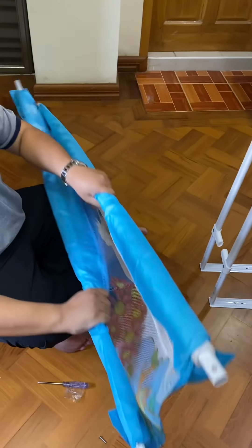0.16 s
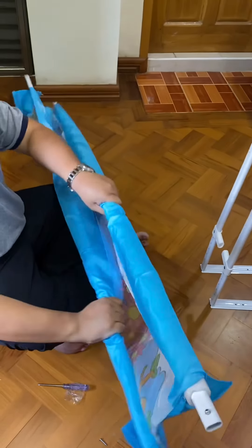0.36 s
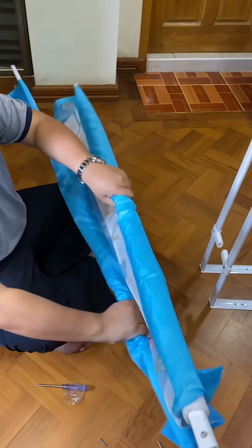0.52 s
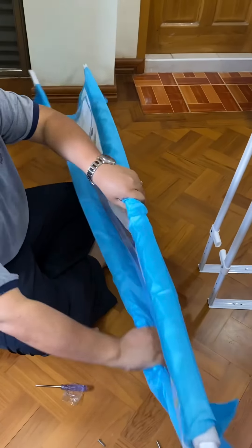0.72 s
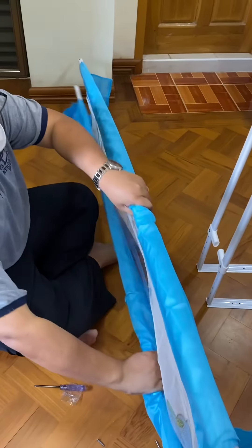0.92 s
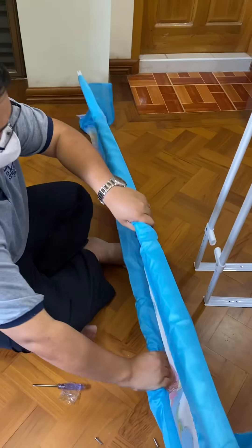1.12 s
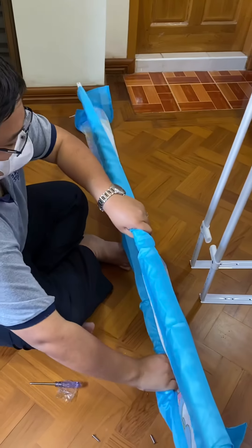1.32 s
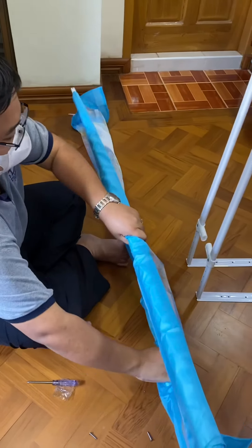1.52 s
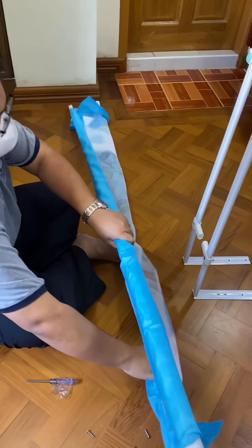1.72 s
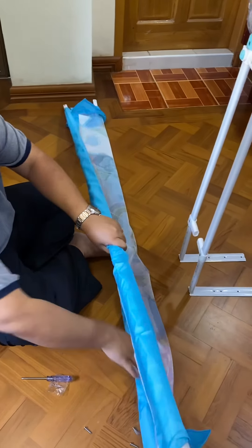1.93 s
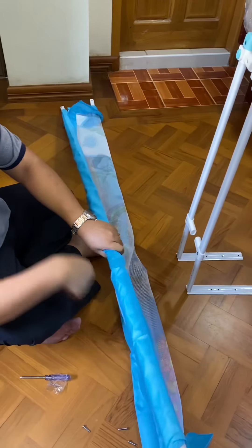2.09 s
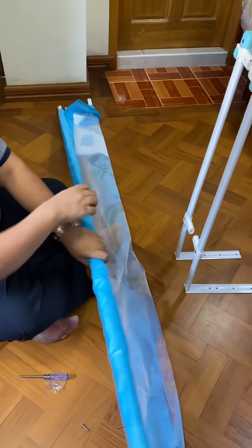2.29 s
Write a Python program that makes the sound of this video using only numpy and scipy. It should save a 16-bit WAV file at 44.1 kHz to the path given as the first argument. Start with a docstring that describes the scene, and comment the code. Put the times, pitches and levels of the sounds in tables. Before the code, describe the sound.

Metal poles in fabric sleeves clank in a small, hard, quiet room. A faint ring fades at the start; a loud, bright double clack with rattle hits at 0.23 seconds, with small taps after. A softer knock comes at 1.06, a sharp click at 1.5, then a cluster from 1.72 to 1.96, strongest near 1.83. Cloth rustles faintly around the knocks, over low hum and hiss.

```python
"""A small hard room: two fabric-sleeved metal poles of a bed rail knock together and on a wooden floor.
Each contact is a damped sine knock, a band of low noise for the floor, a noise burst for the clatter,
and decaying sines for both poles. The sleeves rustle and snap in coloured noise as they slide.
Behind them lie a faint noise hiss and a low hum of sines with wavering phase."""
import sys
import numpy as np
from scipy import signal
from scipy.fft import rfft, irfft, next_fast_len
from scipy.io import wavfile

SR = 44100
rng = np.random.default_rng(int(sys.argv[2]) if len(sys.argv) > 2 else 0)


def bounce(signal):
    """Save signal as a 16-bit WAV file at the path given by the first command-line argument."""
    frames = np.transpose(np.atleast_2d(signal))
    limited = np.clip(frames, -1, 1)
    pcm = np.round(limited * 32767).astype(np.int16)
    wavfile.write(sys.argv[1], SR, pcm)


N = 103635  # length in samples


def amp(db):
    """Amplitude factor of a level in dB."""
    return 10 ** (np.asarray(db) / 20)


def unit(x):
    """The signal scaled to an rms of 1."""
    return x / np.sqrt(np.mean(x ** 2) + 1e-20)


def along(points, hz):
    """Read (Hz, value) points on a log frequency axis."""
    f, v = np.transpose(points)
    return np.interp(np.log(hz + 1), np.log(f + 1), v)


def curve(rows):
    """Draw (s, value) rows as a line with one value per sample."""
    return np.interp(np.arange(N) / SR, *np.transpose(rows))


def fade(t, t60):
    """Exponential decay that loses 60 dB in t60 seconds."""
    return amp(-60 * t / t60)


def filtered(x, response):
    """Multiply the spectrum of x by a response of frequency."""
    m = next_fast_len(x.shape[-1] + 8192)
    spectrum = rfft(x, m) * response(np.fft.rfftfreq(m, 1 / SR))
    return irfft(spectrum, m)[..., :x.shape[-1]]


def noise(response, size):
    """Coloured noise with an rms of 1."""
    return unit(filtered(rng.standard_normal(size), response))


def add(track, s, sound):
    """Mix a mid-side sound in at a time in seconds, which may lie before the start."""
    i = round(s * SR)
    sound = sound[:, max(-i, 0):N - i]
    track[:, max(i, 0):max(i, 0) + sound.shape[1]] += sound


def poles():
    """Every contact excites a knock, the floor, a clatter and both poles, all behind one short attack."""
    # Each row: start in seconds, attack in seconds, knock level in dB, knock pitch in Hz,
    # knock length in seconds, floor thud level in dB, bright pole level in dB, deep pole level in dB,
    # ring length as a factor, clatter level in dB, clatter tilt in dB per octave.
    contacts = [(-.12, 0.0015, -37, 3750, 0.02, -48, -49, -39, 2.96, -30, -5),
                (0.2323, 0.0038, -9.5, 2616, .007, -32, -21, -62, 0.48, -11, 3.5),
                (0.238, 0.0029, -22, 1824, 0.012, -34.5, -32, -45, 1, -22, 3.5),
                (.262, 0.0041, -25.5, 3920, 0.015, -50, -34, -50, 0.75, -35, 1),
                (0.277, 0.0039, -26, 2424, 0.012, -49, -39, -57, 0.49, -36, 7),
                (1.0601, .001, -20, 1892, .008, -38.5, -44, -45, 1.1, -30, -2),
                (1.064, 0.0042, -21, 1676, 0.0086, -41, -37.5, -34, 0.83, -24, 3),
                (1.4935, 0.00077, -13, 1890, 0.0024, -50, -38, -42.5, 1.3, -21.5, 1),
                (1.504, 0.0008, -23.5, 1917, 0.024, -35.5, -48, -40.5, 0.66, -33.5, -5.5),
                (1.7173, 0.0013, -25, 1820, 0.012, -39.5, -54, -31.5, 0.81, -23, -2),
                (1.73, 0.0017, -28.5, 1238, 0.02, -37.5, -50, -33, 0.52, -28.5, 0),
                (1.827, 0.00072, -19, 1780, 0.0029, -35.5, -40, -57, 0.48, -21.5, -0.5),
                (1.834, 0.0042, -12, 2868, 0.006, -35, -41, -33.5, 0.65, -12, 3.5),
                (1.877, 0.0037, -25, 3630, 0.022, -50, -35, -47, 0.6, -45, -8),
                (1.895, 0.0019, -26, 3780, 0.021, -44, -64, -39, 1.5, -38, -8),
                (1.956, 0.0028, -22, 1510, 0.0034, -55, -77, -35.5, 0.79, -26.5, -4)]
    knock_send_db = -10  # the knock reaches the room weaker than the rest
    out, t = np.zeros((2, N)), np.arange(SR // 2) / SR
    for (s, attack_s, knock_db, knock_hz, knock_s, thud_db,
         bright_db, deep_db, length, clatter_db, tilt_db) in contacts:
        rise = np.minimum(t / attack_s, 1) ** 2
        hit = amp(knock_db) * knock(t, knock_hz, knock_s)
        body = amp(thud_db) * floor_thud(t)
        body += amp(clatter_db) * clatter(t, tilt_db)
        body += amp(bright_db) * bright_pole(t, length)
        body += amp(deep_db) * deep_pole(t, length)
        sent = body + amp(knock_send_db) * hit
        add(out, s, placed(rise * (body + hit), rise * sent))
    return out


def knock(t, hz, length_s):
    """A heavily damped sine under a bell-shaped decay, its pitch blurred by a random walk of phase."""
    rough_rad = 0.06  # random phase step per sample
    wander = rough_rad * np.cumsum(rng.standard_normal(len(t)))
    return np.exp(-(t / length_s) ** 2) * np.sin(2 * np.pi * hz * t + wander)


def floor_thud(t):
    """The wooden floor answers with a quickly fading band of noise."""
    centre_hz, width_hz, t60 = 540, 640, 0.036
    return fade(t, t60) * noise(lambda f: np.exp(-((f - centre_hz) / width_hz) ** 2), len(t))


def clatter(t, tilt_db):
    """A short noise burst, after which loose joints rattle on unevenly."""
    # Each row: frequency in Hz, relative noise level in dB per Hz before the contact's tilt.
    clatter_colour = [(120, -34), (300, -26), (700, -10.5), (1230, -4), (1900, -2), (2500, -3.5),
                      (3150, -7.5), (3700, -5), (5040, -12.5), (6000, -4.5), (8000, -17.5), (11300, -28.5),
                      (16000, -15)]
    burst_t60, rattle_t60, rattle_db = 0.042, 0.21, -15
    lump_db, lump = 2, SR // 250  # random level spread in dB, samples held at one level
    grit = noise(lambda f: amp(along(clatter_colour, f) + tilt_db * np.log2((f + 1) / 3000)), len(t))
    steps = np.repeat(rng.standard_normal(len(t) // lump + 1), lump)[:len(t)]
    rattle = amp(rattle_db) * fade(t, rattle_t60) * amp(lump_db * steps)
    return (fade(t, burst_t60) + rattle) * grit


def bright_pole(t, length):
    """The brighter pole rings in its own set of modes."""
    # Each entry: mode frequency in Hz.
    bright_hz = [2379, 2449, 3989, 4533, 5303, 5830, 5997, 6062, 6304, 6450, 6643, 7160, 8100, 8990]
    # Each row: mode level in dB before scatter, t60 in seconds before the ring length factor.
    bright_modes = [(-8.5, 0.26), (-11, 0.18), (-15, 0.12), (-27, 0.27), (-19, 0.28), (-3, 0.18),
                    (-16.5, 0.51), (-2.5, 0.27), (-16, 0.14), (-7, 0.39), (-6, 0.15), (-4, 0.15),
                    (-7, 0.15), (-9, 0.16)]
    return ring(t, bright_hz, bright_modes, length)


def deep_pole(t, length):
    """The deeper pole rings in its own set of modes."""
    # Each entry: mode frequency in Hz.
    deep_hz = [1125, 1240, 1615, 1916, 2536, 2670, 3310, 3428, 3688, 4312, 4750, 5790, 6148, 6878]
    # Each row: mode level in dB before scatter, t60 in seconds before the ring length factor.
    deep_modes = [(-5.5, 0.23), (-9, 0.18), (-8.5, 0.087), (-1.5, 0.24), (-5, 0.18), (-3, 0.22),
                  (-5, 0.068), (-10.5, 0.21), (-8, 0.43), (-21, 0.16), (-10.5, 0.15), (-11, 0.17),
                  (-13.5, 0.16), (-12, 0.16)]
    return ring(t, deep_hz, deep_modes, length)


def ring(t, pitches, modes, length):
    """Bending modes as decaying sines, roughened by random phase and scattered in level at each contact."""
    scatter_db, buzz_rad, buzz_hz = 2.5, 1.5, 76  # level spread, phase spread, phase knots per second
    hz, db, t60 = np.array([pitches, *np.transpose(modes)])[:, :, None]
    knots = rng.standard_normal((len(modes), 40))
    shake = buzz_rad * np.array([np.interp(t * buzz_hz, np.arange(len(row)), row) for row in knots])
    level = amp(db + scatter_db * rng.standard_normal(hz.shape))
    tones = np.sin(2 * np.pi * (hz * t + rng.random(hz.shape)) + shake)
    return (level * fade(t, t60 * length) * tones).sum(axis=0)


def placed(x, sent):
    """Mid and side at a close pair of ports, with a fresh room tail of noise that fades by frequency."""
    # Each row: frequency in Hz, t60 in seconds.
    room_decay = [(300, 0.73), (1000, 0.31), (4000, 0.46), (8000, 0.31), (15000, 0.26)]
    # Direct sound, each row: frequency in Hz, side level against the mid in dB.
    width_dry = [(200, -33), (700, -12), (1500, -17.5), (2800, 1), (6000, -6.5), (9000, 3), (15000, -4)]
    # Room tail, each row: frequency in Hz, gain of the side in dB.
    width_wet = [(200, -26), (700, -0.5), (1500, -8.5), (2800, 4), (6000, -4.5), (9000, 2), (15000, -6)]
    room_db, lag_s, wet_alike = 0, 0.0043, 0.25  # wet_alike: power the tail's side shares with its mid
    hz, t, z = signal.stft(rng.standard_normal((2, SR // 2)), SR, nperseg=256)
    tail = signal.istft(z * fade(t, along(room_decay, hz)[:, None]), SR, nperseg=256)[1]
    tail = np.pad(tail / np.linalg.norm(tail[0]), ((0, 0), (round(lag_s * SR), 0)))
    wet = amp(room_db) * signal.fftconvolve(sent[None], tail, axes=1)[:, :len(x)]
    across = np.sqrt(wet_alike) * wet[0] + np.sqrt(1 - wet_alike) * wet[1]
    # The factor 1j turns the side a quarter cycle against the mid.
    sides = filtered(np.array([x, across]),
                     lambda f: 1j * amp([along(width_dry, f), along(width_wet, f)]))
    return np.array([x + wet[0], sides.sum(axis=0)])


def sleeves():
    """Sliding cloth catches and slips: hiss mixed with fine random grains, and a few single snaps."""
    # Each row: time in seconds, rustle level in dB.
    rustle = [(0, -51.5), (.2, -48), (.5, -56), (.8, -56.5), (.92, -55), (1.0, -43), (1.06, -46.5),
              (1.25, -61.5), (1.41, -57.5), (1.48, -45.5), (1.6, -55.5), (2.1, -65.5), (2.25, -61.5),
              (2.35, -56)]
    # Each row: frequency in Hz, relative noise level in dB per Hz.
    cloth = [(350, -44), (600, -1.5), (881, -10), (944, -16), (1040, -13.5), (1960, -7), (3120, -4.5),
             (16000, -15.5)]
    # Sleeve snaps, each row: start in seconds, level in dB.
    snaps = [(.867, -47.5), (1.36, -50.5), (1.417, -55), (1.45, -44.5), (2.032, -49), (2.205, -62),
             (2.262, -54)]
    grains_per_s, grain_db, grain_share, snap_t60 = 1300, -1.5, 0.17, 0.058  # share is of power
    colour = lambda f: amp(along(cloth, f)) * (f > 500)

    hits = rng.random((2, N)) < grains_per_s / SR
    grains = hits * rng.standard_normal((2, N)) * amp(grain_db * rng.standard_normal((2, N)))
    grains = unit(filtered(grains, colour))
    hiss = noise(colour, (2, N))
    out = amp(curve(rustle)) * (np.sqrt(grain_share) * grains + np.sqrt(1 - grain_share) * hiss)

    t = np.arange(SR // 5) / SR
    for s, db in snaps:
        add(out, s, amp(db) * fade(t, snap_t60) * noise(colour, (2, len(t))))
    return out


def hiss_of_room():
    """Steady room noise, coloured apart in mid and side so that the treble is wide."""
    # Mid, each row: frequency in Hz, relative noise level in dB per Hz.
    air_mid = [(15, -28), (25, -13.5), (59, 2.5), (247, -12.5), (303, -12.5), (362, -10), (412, -19.5),
               (492, -17), (619, -21.5), (798, -22.5), (1710, -24.5), (11000, -60), (14300, -81),
               (22000, -120)]
    # Side, each row: frequency in Hz, relative noise level in dB per Hz.
    air_side = [(35, -74), (60, -11), (113, -10), (250, 3.5), (323, 6.5), (1410, 6), (1550, -25), (2520, 9),
                (3040, -18), (16000, -10.5)]
    mid_db, side_db = -48.5, -61  # rms
    mid = amp(mid_db) * noise(lambda f: amp(along(air_mid, f)) * (f > 20), N)
    side = amp(side_db) * noise(lambda f: amp(along(air_side, f)) * (f > 20), N)
    return np.array([mid, side])


def hum():
    """Low sines in the middle, spread into narrow bands by slow noise in their phase."""
    # Each row: frequency in Hz, level in dB before the peak trim and swell, width of the waver in Hz.
    hum_bands = [(59, -53.5, 12), (82.9, -48.5, 2.1), (165, -59.5, 13)]
    # Swell of every band but the lowest, used about its mean. Each row: time in seconds, level in dB.
    hum_swell = [(0.0, -43), (0.05, -49), (0.27, -42.5), (0.52, -53), (1.09, -51), (1.14, -42), (1.18, -49),
                 (1.9, -45.5), (2.33, -52), (2.35, -38)]
    peak_trim_db, waver_rad = 1.5, 0.85
    swell = curve(hum_swell)
    swell = swell - swell.mean()
    t, mid = np.arange(N) / SR, np.zeros(N)
    for k, (hz, db, width_hz) in enumerate(hum_bands):
        waver = waver_rad * noise(lambda f: np.exp(-(f / width_hz) ** 2), N)
        level = amp(db + peak_trim_db + swell * (k > 0))
        mid += level * np.sin(2 * np.pi * (hz * t + rng.random()) + waver)
    return np.array([mid, np.zeros(N)])


def scene():
    """Sum the layers in mid and side, then turn them into left and right."""
    mid, side = poles() + sleeves() + hiss_of_room() + hum()
    return np.array([mid + side, mid - side])


def record(dry):
    """The stereo centre has a narrow dip and loses its top treble; both channels stop at a band limit."""
    dip_hz, dip_width_hz, dip_db = 4866, 160, 3  # the two ports partly cancel here
    centre_hz, centre_db_per_khz, top_hz = 10700, 25, 16000

    def centre_response(f):
        """Treble slope above the corner, and the bell-shaped dip."""
        slope_db = centre_db_per_khz * np.maximum(f - centre_hz, 0) / 1000
        notch_db = dip_db * np.exp(-((f - dip_hz) / dip_width_hz) ** 2)
        return amp(-slope_db - notch_db)

    mid = filtered(dry.mean(axis=0), centre_response)
    side = (dry[0] - dry[1]) / 2
    return filtered(np.array([mid + side, mid - side]), lambda f: f < top_hz)


dry = scene()
out = record(dry)
bounce(out)
```